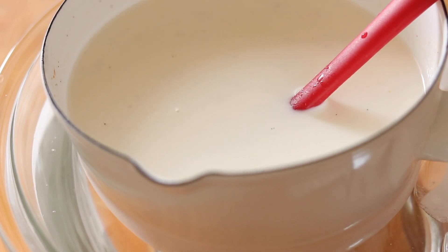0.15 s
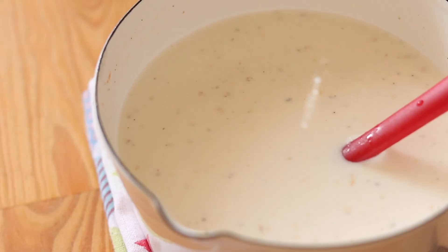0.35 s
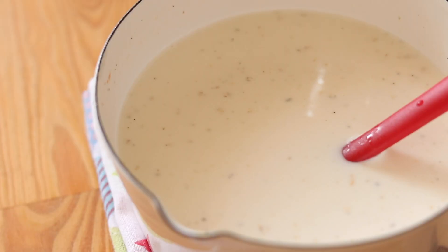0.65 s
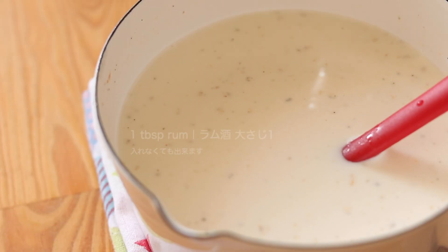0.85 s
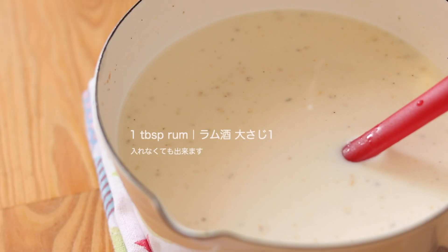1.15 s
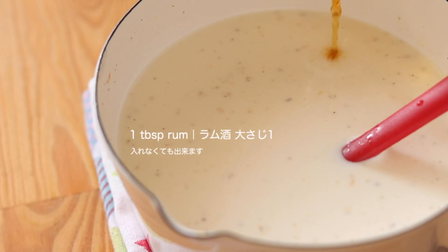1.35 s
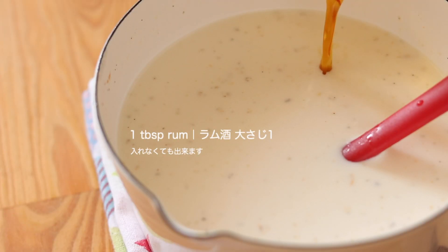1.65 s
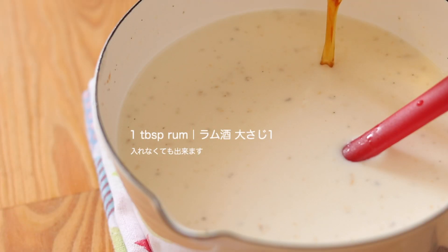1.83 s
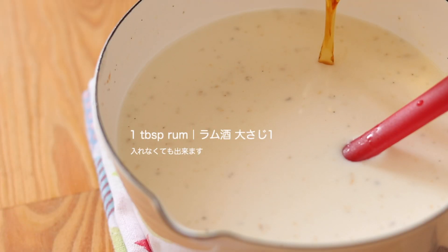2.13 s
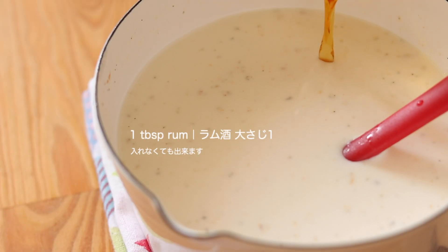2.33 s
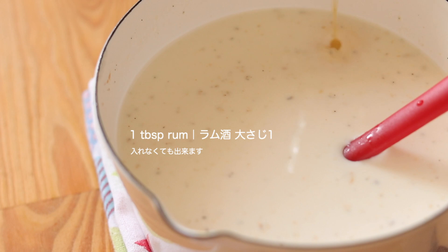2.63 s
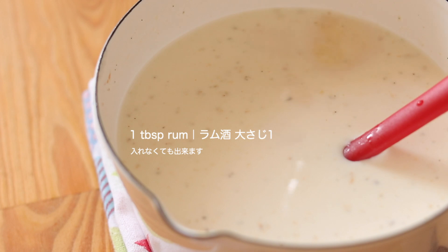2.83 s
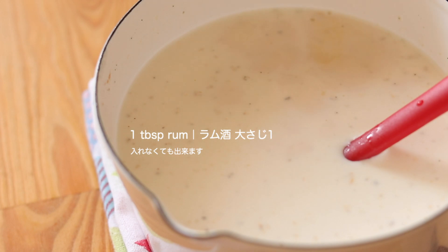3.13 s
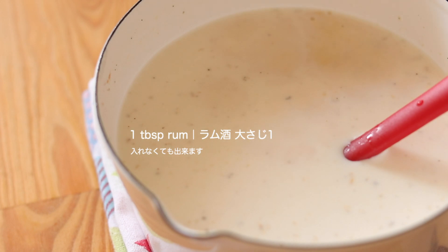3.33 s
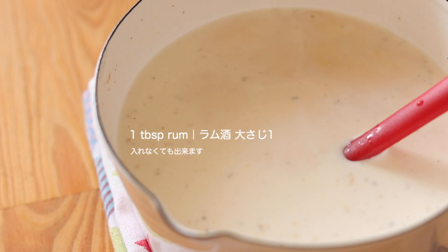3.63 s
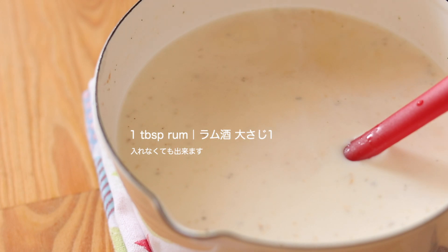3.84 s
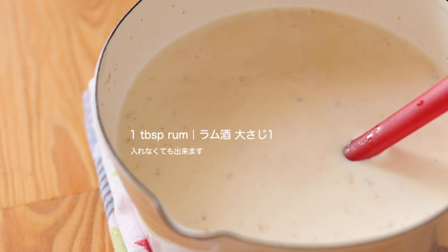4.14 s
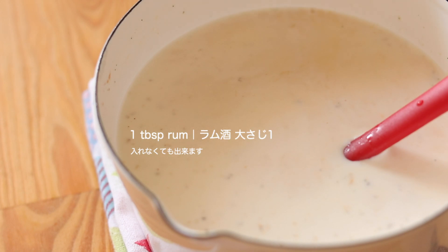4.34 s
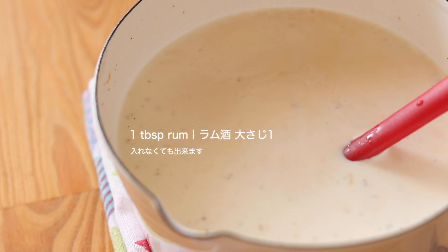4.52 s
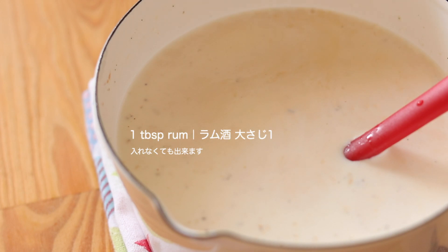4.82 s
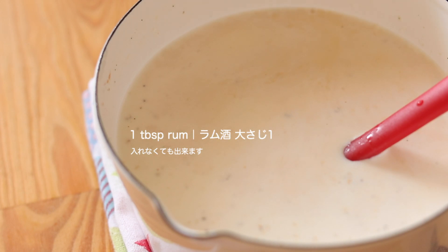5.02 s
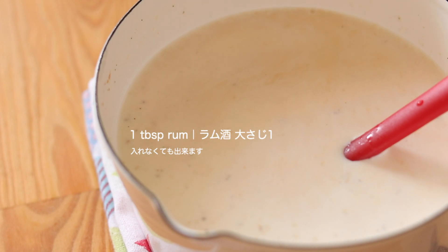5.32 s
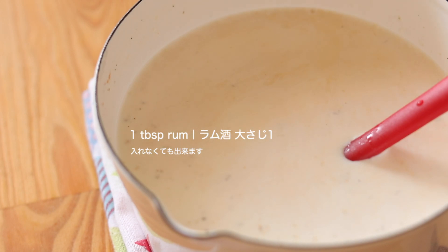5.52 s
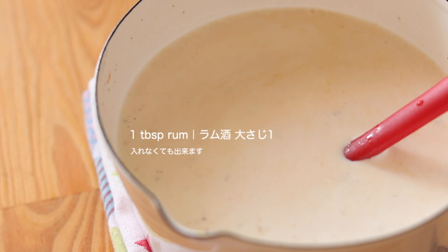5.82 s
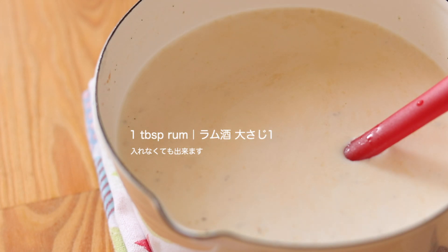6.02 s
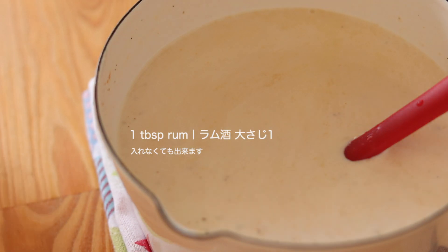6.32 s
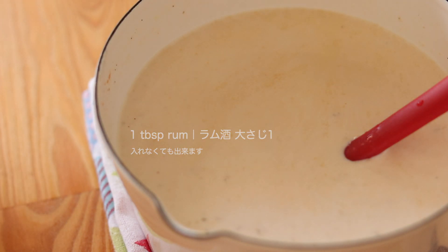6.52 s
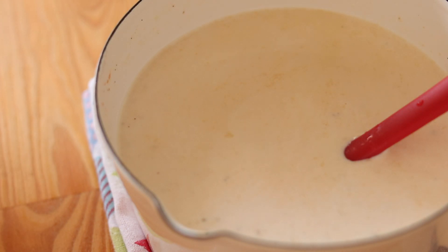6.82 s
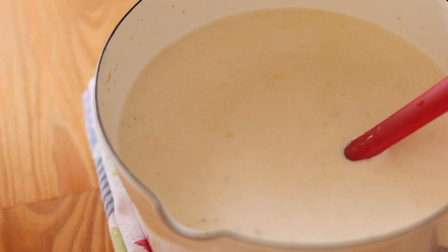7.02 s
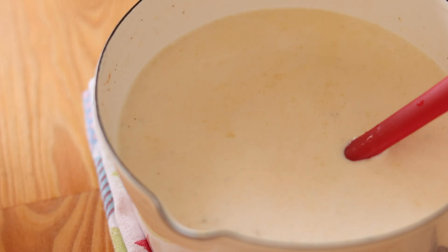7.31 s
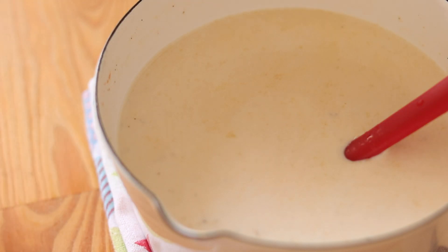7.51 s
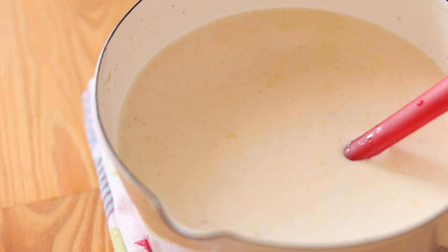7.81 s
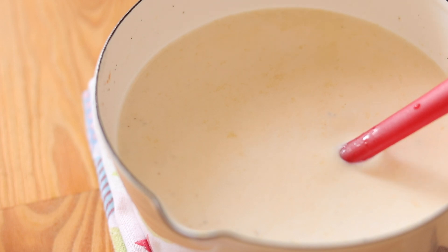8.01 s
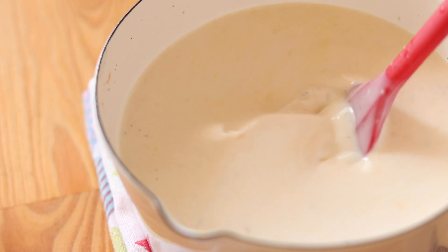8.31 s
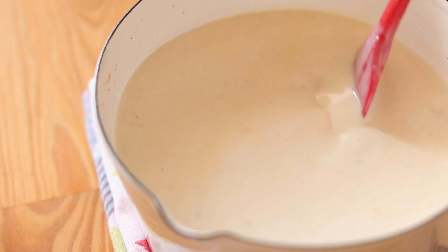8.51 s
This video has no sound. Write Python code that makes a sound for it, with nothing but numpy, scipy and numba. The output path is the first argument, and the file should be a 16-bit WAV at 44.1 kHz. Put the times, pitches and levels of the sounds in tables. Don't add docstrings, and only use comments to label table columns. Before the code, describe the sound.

Quiet kitchen: one ringing pan knock, small liquid plips, a scratchy bottle cap twisting with sharp clicks, finally a bottle set down on a table.

```python
import sys
import numpy as np
from scipy import signal
from scipy.fft import rfft, irfft, next_fast_len
from scipy.io import wavfile
from scipy.ndimage import uniform_filter1d
from numba import njit

SR = 44100
rng = np.random.default_rng(int(sys.argv[2]) if len(sys.argv) > 2 else 0)


def volts(x):
    e = np.asarray(x, float) / 20
    return 10 ** e


def unload_wav(signal):
    wavfile.write(
        sys.argv[1],
        SR,
        np.round(np.clip(np.atleast_2d(signal).T, -1, 1) * 32767).astype(np.int16),
    )


N = 381685


def on_bins(points, size):
    hz, value = np.transpose(points)
    bins_hz = np.arange(size // 2 + 1) * SR / size
    return np.interp(np.log(bins_hz + 1), np.log(hz), value)


def colour(x, points, share=1):
    size = next_fast_len(N)
    gain = volts(share * on_bins(points, size))
    gain = gain / np.sqrt(np.mean(gain ** 2))
    return irfft(rfft(x, size) * gain, size)[..., :N]


@njit
def svf(x, hz, width):
    y, band, low = np.empty(len(x)), 0., 0.
    for i in range(len(x)):
        g, k = np.tan(np.pi * hz[i] / SR), width / hz[i]
        v = (band + g * (x[i] - low)) / (1 + g * (g + k))
        band = 2 * v - band
        low += 2 * g * v
        y[i] = k * v
    return y * np.sqrt(SR / (np.pi * width))


# freq_hz, density_db_per_hz
HISS_SPECTRUM = [(12, -28.5), (24, 9.5), (30, -4.5), (159, -3.5), (272, -7.5), (414, -4.5), (532, -9),
                 (595, -9.5), (666, -12.5), (1590, -15), (3300, -19.5), (5020, -24.5), (6280, -24),
                 (9840, -23), (15000, -30), (16300, -37)]
# freq_hz, likeness_0_to_1
HISS_LIKENESS = [(25, 1), (60, 0.7), (130, 0.3), (290, 0.53), (640, 0.2), (1410, 0.08), (3100, 0),
                 (6820, 0), (15000, 0.02)]


def hiss():
    level_db = -64 + 2.0
    size = next_fast_len(N)
    alike = np.clip(on_bins(HISS_LIKENESS, size), 0, 1)
    noise = rfft(rng.standard_normal((2, size)))
    mid, side = noise * np.sqrt([(1 + alike) / 2, (1 - alike) / 2])
    stereo = irfft(np.array([mid + side, mid - side]), size)[:, :N]
    return colour(stereo, HISS_SPECTRUM) * volts(level_db + np.array([[.6], [-.6]]))


def room(x, wet_db, early_db):
    late_t60_s, early_t60_s, build_s = 0.23, 0.054, 0.0054
    t = np.arange(int(.5 * SR)) / SR
    noise = rng.standard_normal((2, len(t)))
    bass = uniform_filter1d(noise, size=60, axis=1)
    middle = uniform_filter1d(noise, size=9, axis=1) - bass
    treble = noise - middle - bass
    late = (middle + 1.5 * bass.mean(0) + .5 * treble) * 1000 ** (-t / late_t60_s)
    late = late * np.clip(t / build_s, 0, 1)
    early = np.diff(rng.standard_normal((2, len(t) + 1))) * 1000 ** (-t / early_t60_s)
    response = volts(wet_db) * late / np.sqrt(np.sum(late ** 2) / 2)
    response = response + volts(early_db) * early / np.sqrt(np.sum(early ** 2) / 2)
    return x + signal.fftconvolve(x, response, axes=1)[:, :N]


# start_s, peak_db, pitch_hz, t60_s, pitch_rise_share
DROP_EVENTS = [
    (1.384, -38, 2440, 0.035, 0.033),
    (2.644, -36, 4200, 0.0099, .05),
    (2.666, -32, 2790, 0.032, 0.5),
    (2.689, -31.5, 2500, 0.039, 0.19),
]
# start_s, peak_db, pitch_hz, t60_s
TICK_EVENTS = [(0.024, -65, 6260, 0.037), (.083, -60.5, 6200, .03), (.205, -58, 6770, 0.16),
               (.322, -57, 4000, .006), (2.583, -49, 116.6, 0.26), (2.637, -55, 13800, .012),
               (2.645, -47, 8850, 0.0022), (2.646, -56, 4650, 0.25), (2.646, -50, 4200, .05),
               (2.757, -56, 15400, .02), (2.806, -56, 15000, 0.0042), (3.551, -49.5, 533.3, 0.37),
               (4.49, -36, 960, 0.023), (4.579, -23, 248, 0.037), (4.582, -33, 1110, 0.016),
               (4.817, -23, 1080, 0.01), (5.031, -47.5, 2940, 0.17), (5.195, -63, 10220, 0.17),
               (5.201, -64, 5890, 0.1), (5.235, -59, 4930, 0.12), (5.235, -63, 14120, .05),
               (5.461, -55, 9630, 0.024), (5.462, -58, 6500, 0.02), (5.477, -59, 9500, .03),
               (5.477, -59.5, 4060, 0.06), (5.7, -66, 3730, 0.36), (2.757, -58, 13000, .004),
               (2.688, -53, 6200, .006), (5.05, -64, 6150, .15), (5.462, -60, 8300, 0.0066)]


def drops():
    out, t = np.zeros(N), np.arange(SR // 4) / SR
    flutter = rng.standard_normal((len(TICK_EVENTS), len(t)))
    flutter = uniform_filter1d(flutter, size=300, axis=1) * 17
    rows = [(*row, 0) for row in DROP_EVENTS]
    rows += [(*row, 0, shake) for row, shake in zip(TICK_EVENTS, flutter)]
    for start_s, peak_db, hz, t60_s, rise, shake in rows:
        phase = 2 * np.pi * hz * (t + rise * t ** 2 / t60_s) + 0.83 * min(hz / 3000, 1) * shake
        fade = 1000 ** (-t / t60_s) * np.minimum(40 * t / t60_s, 1)
        start = int(start_s * SR)
        out[start:start + len(t)] += volts(peak_db + 2.3 * shake) * fade * np.sin(phase)
    return out * volts([[-1.5], [1.5]])


def blow(event, modes, rattle, gain_db, rattle_db, rattle_t60_s, push_ms, spread):
    start_s, peak_db, pan_db = event
    t = np.arange(SR // 2) / SR
    hz, mode_db, t60_s = np.transpose(modes)[:, :, None]
    chance = rng.standard_normal((2, 2, len(modes), 1)) * spread * np.minimum(hz / 1500, 1)
    beat = 1 + 0.16 * np.cos(2 * np.pi * t * 25 * rng.uniform(0.36, 1.3, (len(modes), 1)))
    fade = 1000 ** (-t / np.clip(t60_s, .02, .6))
    ring = volts(mode_db + 2.9 * chance[0]) * beat * fade * np.sin(2 * np.pi * hz * t + chance[1])
    mid, side = rng.standard_normal((2, N))
    side = np.diff(colour(side, rattle), prepend=0) * np.array([[3.], [-3.]])
    dense = colour(mid, rattle) + spread * side
    hit = ring.sum(1) + volts(rattle_db) * dense[:, :len(t)] * 1000 ** (-t / rattle_t60_s)
    out, start = np.zeros((2, N)), int((start_s + 0.00058) * SR)
    out[:, start:start + len(t)] = hit * (1 - np.exp(-t * 1000 / push_ms))
    return out * volts(peak_db + gain_db + np.array([[pan_db], [-pan_db]]) / 2)


# start_s, peak_db, left_minus_right_db
KNOCK_EVENT = [
    (0.902, -15, 0),
]
# freq_hz, level_db, t60_s
SAUCEPAN_MODES = [(453, -15.5, 0.34), (486, -10, 0.31), (560, -25, 0.54), (673, -2.5, 0.25),
                  (970, -27, 0.17), (1163, -26, 0.39), (1264, -13.5, 0.22), (1330, 11, 0.017),
                  (1430, -11, 0.25), (1450, -20, 0.15), (1740, -18, 0.21), (1904, 4.5, 0.22),
                  (1880, -9, 0.18), (2140, -3.5, 0.12), (2300, -31, 0.29), (2358, -17, 0.19),
                  (2770, -32, 0.45), (3128, -16.5, 0.16), (3460, -13.5, 0.27), (3520, -21, 0.2),
                  (3630, -22, 0.35), (3714, -25, 0.25), (3919, -14.5, 0.11), (3990, -13, 0.14),
                  (3970, -25, 0.18), (4900, -37, 0.2), (6930, -29, 0.19), (6961, -44, 0.42)]
# freq_hz, density_db_per_hz
SAUCEPAN_RATTLE = [(300, -45), (430, -14), (596, -4.5), (664, -5.5), (856, -16), (1260, -14.5), (1660, -21),
                   (1940, 0), (2470, -59), (3550, -23), (4310, -53), (7150, -45), (7500, -56), (9750, -84),
                   (16500, -120)]


def knock():
    return blow(KNOCK_EVENT[0], SAUCEPAN_MODES, SAUCEPAN_RATTLE, gain_db=-14.0, rattle_db=-3.5,
                rattle_t60_s=0.25, push_ms=1.0, spread=0.79)


# start_s, peak_db, left_minus_right_db
THUD_EVENT = [
    (6.9425, -9.5, 1.4),
]
# freq_hz, level_db, t60_s
WOOD_MODES = [(155.6, -0.5, 0.15), (199.5, -2.5, 0.3), (238.3, -10, 0.28), (270, -15.5, 0.23),
              (380, -15, 0.38), (451, -17, 0.34), (480, -26.5, 0.44), (599, -20.5, 0.25),
              (659, -20.5, 0.26), (332, -13, 0.18), (853, -19.5, 0.19), (905, -18, 0.19), (1118, -26, 0.21),
              (1190, -20.5, 0.22)]
# freq_hz, density_db_per_hz
WOOD_RATTLE = [(65, -62.5), (110, -40.5), (141, -5.5), (205, 1), (258, -6.5), (581, -15.5), (692, -24.5),
               (1150, -23.5), (1600, -41.5), (1930, -34.5), (2200, -42), (2470, -40), (3500, -64),
               (4550, -94), (7700, -120)]


def thud():
    return blow(THUD_EVENT[0], WOOD_MODES, WOOD_RATTLE, gain_db=-8.0, rattle_db=-5.5,
                rattle_t60_s=0.3, push_ms=1.0, spread=0.63)


def bump():
    bounce_hz, level_db, t60_s, rise_s = 55, -48.5, .3, 0.013
    t = np.maximum(np.arange(N) / SR - THUD_EVENT[0][0], 0)
    fade = 1000 ** (-t / t60_s) * np.minimum(t / rise_s, 1)
    return volts(level_db) * np.sin(2 * np.pi * bounce_hz * t) * fade


def strokes(rows, rise_db_s, fall_db_s):
    start_s, length_s, level_db, swell_db = np.transpose(rows)[:4, :, None]
    since = np.arange(N) / SR - start_s
    hold = level_db + swell_db * np.clip(since / length_s, 0, 1)
    rise = rise_db_s * np.minimum(since, 0)
    fall = fall_db_s * np.maximum(since - length_s, 0)
    return np.maximum(hold + rise - fall, -150)


# start_s, length_s, level_db, swell_db
SING_STROKES = [(3.59, .025, -50, -4), (3.63, .06, -65, -6), (3.82, .03, -61, 6), (3.865, 0.18, -51.5, 1),
                (4.03, 0.081, -48, 2.5), (4.165, 0.028, -39, 8), (4.227, 0.056, -34, 6),
                (4.3, .02, -37.5, -3.5), (4.335, 0.04, -35.5, -2), (4.38, .04, -39.5, -2.5),
                (4.49, 0.065, -49.5, 2), (4.58, .01, -34, -5), (4.6, .1, -47, -1.5), (4.72, 0.062, -51, 7),
                (4.817, .025, -36, -5), (4.85, 0.091, -35.5, 0), (4.97, 0.085, -54, -7),
                (5.12, 0.069, -68, -1), (5.195, 0.041, -61, -2), (5.25, 0.065, -70, -2)]
# freq_hz, level_db
WALL_MODES = [(3756, -2), (3738, -5), (3428, -10), (3463, -14), (4855, -14)]


def singing():
    now, out, lag_s = np.arange(N) / SR, 0, np.array([[5e-5], [0]])
    for hz, db in WALL_MODES:
        waver = uniform_filter1d(rng.standard_normal((2, N)), size=1800, axis=1) * 42
        phase = 2 * np.pi * hz * (now - lag_s) + 0.5 * waver[1]
        out = out + volts(db + 1.5 * waver[0]) * np.sin(phase)
    level_db = strokes(SING_STROKES, rise_db_s=699.5, fall_db_s=418).max(0)
    return out * volts(level_db + np.array([[-2.], [1.5]]))


def contact(rough_db, catches_hz, patchy_db):
    grains = rng.standard_normal(N) * volts(rough_db * np.minimum(rng.exponential(size=N), 5))
    hold = int(SR / catches_hz)
    catches = np.repeat(rng.standard_normal(N // hold + 1), hold)
    catches = uniform_filter1d(catches, hold // 2)[:N]
    force = grains * volts(patchy_db * catches)
    return force / np.sqrt(np.mean(force ** 2))


def grit(low_hz, count, alike, patchy_db):
    out = 0
    for hz in low_hz * 1.25 ** np.arange(count):
        spots = []
        for _ in range(3):
            force = contact(rough_db=1.0, catches_hz=59.75, patchy_db=patchy_db)
            spots.append(svf(force, np.full(N, hz), hz / 4))
        both = alike * spots[0] + np.sqrt(1 - min(alike, 1) ** 2) * np.array(spots[1:])
        out = out + np.sqrt(hz / 65000) * both
    return out


# start_s, length_s, rubbing_db, swell_db, pocket_seal_db
CAP_STROKES = [(3.526, .02, -68.5, 14, -11), (3.598, 0.0085, -51, -6, 3.5), (3.67, 0.095, -76.5, -5, 16),
               (3.807, 0.067, -66.5, 7, 25.5), (3.872, 0.048, -49, -1.5, 4), (4.015, 0.013, -55, -10, 0),
               (4.086, 0.0078, -41, -14.5, 0.5), (4.142, 0.12, -41, 4, 4), (4.286, 0.079, -41.5, -4, 5.5),
               (4.36, 0.027, -45.5, 2, -5), (4.506, 0.063, -32.5, -6, -20), (4.579, 0.13, -32.5, -5, 3),
               (4.827, 0.028, -39.5, 4, -20), (4.854, 0.056, -36, 0, -9.5), (4.993, 0.12, -50, -20.5, -16)]
# start_s, rubbing_swell_db, extra_neck_swell_db
THREAD_JUDDERS = [(3.916, 8.5, 0), (3.962, 10.5, 5.5), (4.182, 2, 0), (4.21, 1, 4), (4.231, 6, 5),
                  (4.25, 1.5, -2), (4.283, 8.5, -3.5), (4.334, 6, 0), (4.381, 5.5, 4.5), (4.387, 8.5, 0),
                  (4.498, 2, 0), (4.539, 9, -1), (4.57, 3.5, 5.5), (4.583, 5, -1.5), (4.608, -1, 11),
                  (4.678, 1.5, -2), (4.693, 6, -1), (4.718, 2, -1), (4.745, -4.5, 11), (4.779, 10.5, 2),
                  (4.875, 6.5, 11), (4.892, 1.5, 12), (4.923, 3, 3), (4.94, 9, 7)]


def hand():
    dull_db, bright_db, brighten_s = -6, 4, 0.029
    judder_ms, let_go_ms = 5.8, 7.6
    now = np.arange(N) / SR
    power = volts(2 * strokes(CAP_STROKES, rise_db_s=494, fall_db_s=213))
    share = power / power.sum(0)
    table = np.array(CAP_STROKES)
    since = np.maximum(now - table[:, :1], 0)
    brightness_db = bright_db + (dull_db - bright_db) * np.exp(-since / brighten_s)
    top_db = np.sum(share * brightness_db, axis=0)
    rub_db = 10 * np.log10(power.sum(0))
    seal_db = table[:, 4] @ share
    neck_db = 2 - 0.37 * (np.maximum(rub_db, -70) + 40.5) + 0.47 * seal_db
    for start_s, swell_db, ring_db in THREAD_JUDDERS:
        width_ms = np.where(now < start_s, judder_ms, let_go_ms)
        bind = np.exp(-((now - start_s) * 1000 / width_ms) ** 2)
        rub_db = rub_db + swell_db * bind
        neck_db = neck_db + ring_db * bind
    return rub_db, top_db, seal_db, neck_db


def air_pocket(force, pocket_hz):
    blur_db = 0.065 * (481 - pocket_hz)
    driven = svf(force, pocket_hz, 256.0)
    clear = svf(driven * volts(-2.2 * np.maximum(blur_db, 0)), pocket_hz, 89.96)
    clear = svf(clear, pocket_hz, 29.4)
    blurred = svf(driven * volts(blur_db), 0.94 * pocket_hz, 150.)
    return volts(-39.0) * clear + volts(-23) * blurred


# start_s, peak_db, brightness_db, tap_db, pocket_db
THREAD_CLICKS = [(3.5472, -30.5, -13, 11, -23), (3.5704, -25, -0.5, 6, -37.5), (3.5837, -21, -2, 1, -31),
                 (3.6369, -52, -10, 11, -16), (3.7967, -54.5, -22, 19.5, -7),
                 (4.017, -33.5, 2.5, -19.5, -33), (4.0299, -20, 14, -12.5, -36),
                 (4.0745, -20, -23, -6.5, -25.5), (4.106, -40, -9, 0.5, -16), (4.135, -38.5, -5, 0, -16),
                 (4.1482, -34.5, -6, 4, -15), (4.1606, -26, -1.5, -3, -11.5), (4.1764, -27, -3, -1, -17),
                 (4.2086, -27, 0, 0, -14), (4.227, -20, 6.5, -3, -19), (4.236, -23, 3.5, 1, -20),
                 (4.2801, -24.5, -4.5, -4, -19.5), (4.285, -23.5, -2.5, -3, -20),
                 (4.3328, -26.5, -2.5, 0.5, -6), (4.3603, -29.5, 6, -4, -14.5),
                 (4.3848, -23, -1.5, -5, -30), (4.394, -22.5, -4.5, -8.5, -19),
                 (4.4893, -33.5, -10, 0.5, -25), (4.4979, -30, -1, 3, -21.5), (4.5342, -24, 5.5, -5, -29),
                 (4.5637, -22, -2, 3, -3.5), (4.5794, -10, 3.5, -0.5, -8.5), (4.607, -32, -11, 10, -26),
                 (4.628, -29.5, 6.5, -14, -12), (4.6554, -29, -2, 1, -20), (4.6759, -27.5, -2, 5, -20),
                 (4.688, -25.5, 6, 0, -23), (4.753, -30, 9.5, -2, -24), (4.7645, -23, 3.5, -12, -29),
                 (4.779, -27.5, 0, -11, -25), (4.816, -7.5, -2, -37, -22), (4.8734, -19, 3.5, 1.5, -26),
                 (4.922, -29.5, 1, 0, -25), (4.941, -28, -2, -5, -25)]
# time_s, pocket_hz, neck_hz
CAP_HEIGHT = [(3.551, 530, 2170), (3.587, 528, 1810), (3.8, 508, 1960), (3.85, 505, 1860), (3.9, 447, 1590),
              (3.98, 390, 1410), (4.09, 360, 1740), (4.58, 363, 1740), (4.65, 421, 1834), (4.8, 424, 1870),
              (4.83, 430, 2480), (4.9, 435, 2450), (4.94, 434, 3010)]
# freq_hz, width_hz, level_db
GLASS_MODES = [(2372, 40, -16.5), (3420, 20, -17), (3743, 20, -9), (4845, 30, -15), (6014, 81, -12)]
# freq_hz, density_db_per_hz
COARSE_SPECTRUM = [(680, -51), (1150, -14.5), (1520, -7.5), (1750, -7.5), (2120, -2.5), (2870, -4.5),
                   (3690, -3), (4050, -10), (4500, -19.5), (5600, -22), (7280, -49.5), (12300, -120)]
# freq_hz, density_db_per_hz
FINE_SPECTRUM = [(2650, -46.5), (4550, -21.5), (4860, -13), (5150, -20), (6100, -8), (7540, -10.5),
                 (9480, -3.5), (12600, -16.5), (15100, -18), (16200, -40), (16500, -40.5)]
# freq_hz, left_minus_right_db
SIDE_BALANCE = [(60, -2), (110, -3), (200, 1.5), (380, -1.5), (700, 2), (1290, -3), (2380, -6),
                (4400, -1.5), (8120, -6), (15000, -5.5)]


def cap():
    now = np.arange(N) / SR
    rub_db, top_db, seal_db, neck_db = hand()
    time_s, *pitches = np.transpose(CAP_HEIGHT)
    pocket_hz, neck_hz = (np.interp(now, time_s, hz) for hz in pitches)
    rub = contact(rough_db=1.9, catches_hz=89.26, patchy_db=4.0)
    coarse = grit(1148.0, count=7, alike=0.76, patchy_db=4.5) * volts(rub_db - 1.5)
    fine = grit(5100.0, count=6, alike=0.53, patchy_db=5.5) * volts(rub_db + top_db + np.array([[-3.], [-4.]]))
    neck_force = rub * volts(rub_db + neck_db - 5)
    pocket_force = rub * volts(rub_db + seal_db - 7.0)
    body_force = rub * volts(rub_db - 4)

    t, taps = np.arange(1500) / SR, np.zeros(N)
    for start_s, peak_db, bright_db, tap_db, pocket_db in THREAD_CLICKS:
        start = int(start_s * SR)
        part = slice(start, start + len(t))
        crack = rng.standard_normal(len(t)) * np.exp(-t / 0.002) * volts(peak_db)
        tap_shape = np.exp(-t / 0.0012) * (1 - np.exp(-t / 0.00047))
        tap = volts(peak_db + tap_db) * np.sin(2 * np.pi * neck_hz[start] * t) * tap_shape
        coarse[:, part] += crack * volts(-5)
        fine[:, part] += crack * volts(bright_db - 3)
        pocket_force[part] += crack * volts(pocket_db - 4)
        body_force[part] += crack * volts(-6)
        neck_force[part] += volts(-9.5) * tap
        taps[part] += tap

    glass = 0
    for hz, width_hz, db in GLASS_MODES:
        centre_hz = np.full(N, 1. * hz)
        glass = glass + volts(db) * svf(svf(body_force, centre_hz, 1. * width_hz), centre_hz, 410.0)
    neck = svf(svf(neck_force, neck_hz, 230.0), neck_hz, 450.0) * volts(-15.0)
    shell_hz = np.full(N, 900.)
    shell = svf(body_force * volts(0.75 * (rub_db + 29.5)), shell_hz, 1200.0)
    shell = svf(shell, shell_hz, 820.0) * volts(-17.0)
    surface = colour(coarse, COARSE_SPECTRUM) + colour(fine, FINE_SPECTRUM)
    left, right = surface + shell + volts(-12.5) * glass + neck + air_pocket(pocket_force, pocket_hz) + taps
    left = colour(np.roll(left, shift=3), SIDE_BALANCE, 1.0)
    right = colour(right, SIDE_BALANCE, -0.064)
    return np.array([left, right]) * volts([[-2.], [2.]])


def scene():
    near = room(drops(), wet_db=-10.5, early_db=-3.5)
    near = near + room(knock(), wet_db=-7, early_db=-16)
    near = near + room(thud(), wet_db=-10.5, early_db=-14)
    near = near + room(singing(), wet_db=-13, early_db=-18)
    near = near + room(cap(), wet_db=-9.5, early_db=-13.5)
    low_cut = signal.butter(5, 125, "high", fs=SR, output="sos")
    return hiss() + bump() + signal.sosfilt(low_cut, near)


def band_limit(x):
    return signal.sosfilt(signal.butter(12, 16830, fs=SR, output="sos"), x)


# freq_hz, gain_db
MIC_RESPONSE = [(4200, -1), (4900, -2), (5700, 1), (16000, 0.5)]
# freq_hz, gain_db
TOP_LIMIT = [(16050, 0), (16130, -30), (16750, -30), (16950, -70)]


def record(dry):
    rounded = 1.05 * np.tanh(dry / 1.05)
    return band_limit(colour(rounded, MIC_RESPONSE + TOP_LIMIT))


dry = scene()
out = record(dry)
unload_wav(out)
```